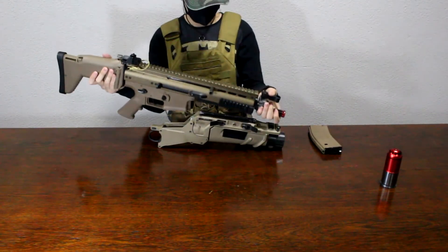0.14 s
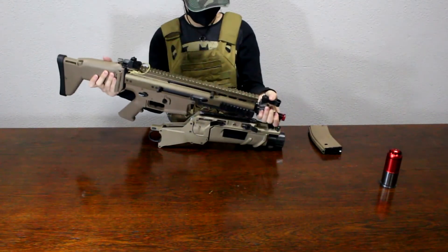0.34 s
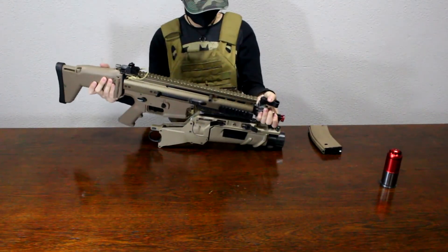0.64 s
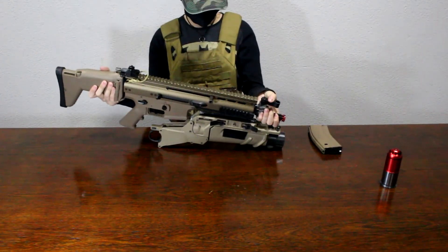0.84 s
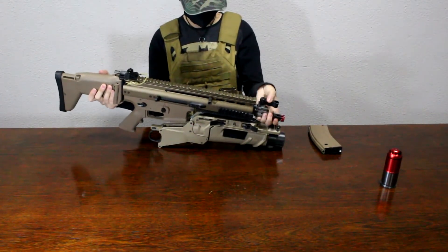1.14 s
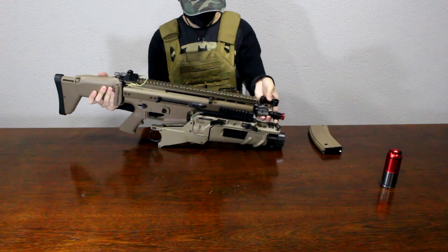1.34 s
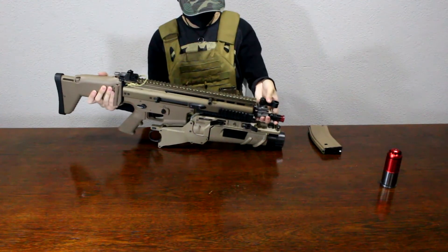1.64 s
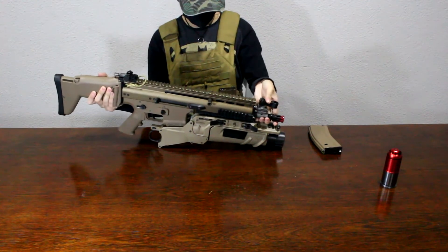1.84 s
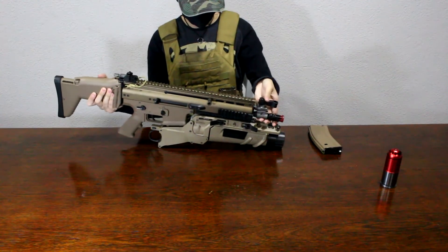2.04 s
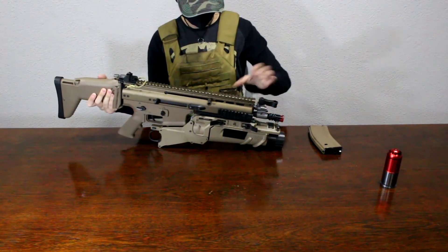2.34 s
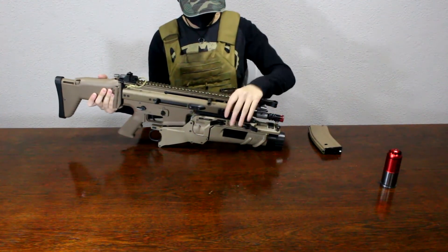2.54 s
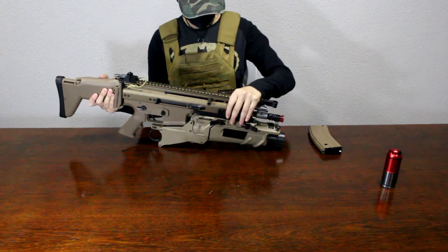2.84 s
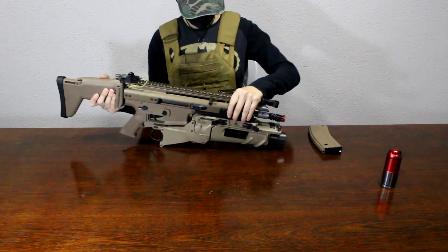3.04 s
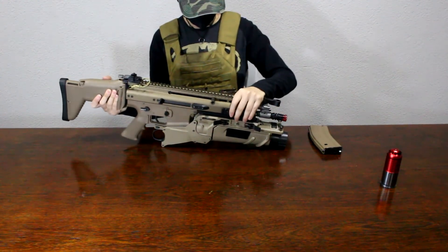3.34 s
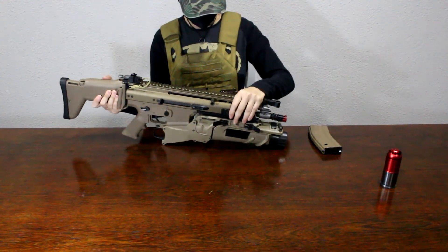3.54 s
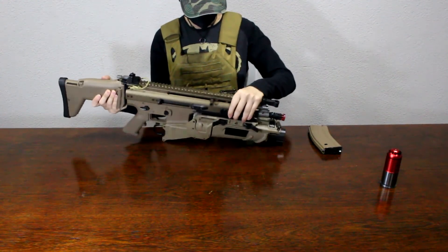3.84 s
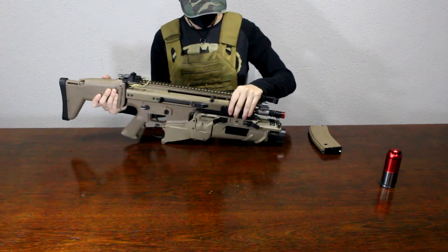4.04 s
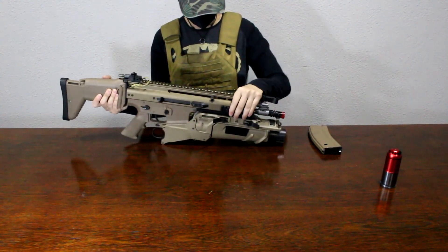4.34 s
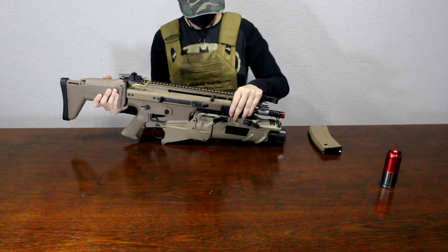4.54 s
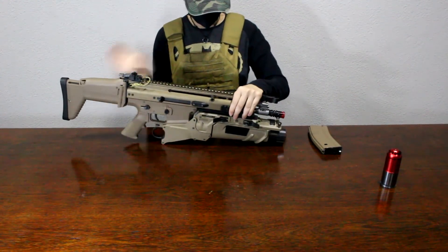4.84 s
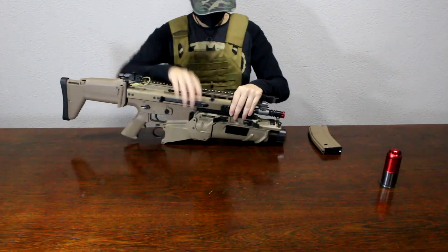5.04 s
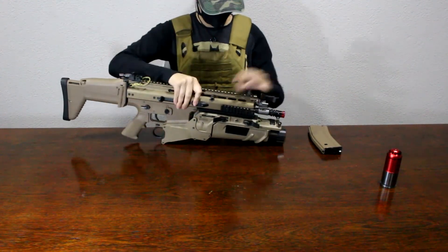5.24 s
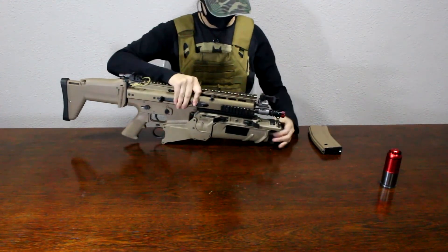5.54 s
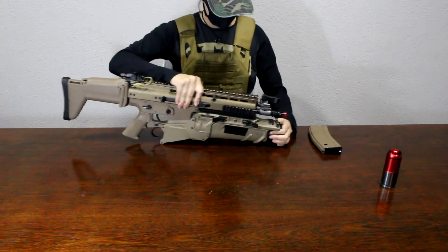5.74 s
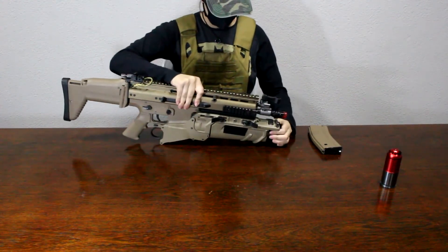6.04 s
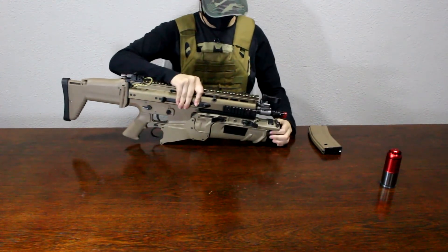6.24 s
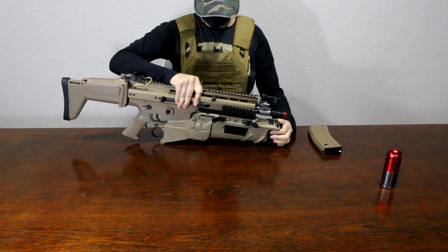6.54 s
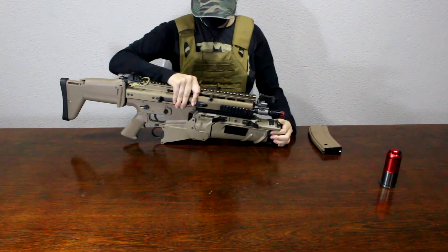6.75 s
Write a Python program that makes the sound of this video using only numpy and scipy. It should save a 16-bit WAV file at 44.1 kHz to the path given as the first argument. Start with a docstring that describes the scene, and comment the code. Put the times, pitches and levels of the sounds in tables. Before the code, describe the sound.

Plastic and metal rifle parts click and knock together on a wooden table, with two loud snaps in a bare, echoing room.

```python
"""Fitting a launcher under a rifle

Plastic and metal parts snap and knock together on a wooden table in a bare room. Each impact excites
damped modes of the parts and of the table, whose top also reflects the sound. A few blows ring the hollow
launcher tube, the hardest a steel pin, and parts and sleeves drag briefly with stick-slip friction.
The room reverberates for about a second over its own quiet hum and hiss."""
import sys
import numpy as np
from scipy import signal
from scipy.fft import rfft, irfft
from scipy.io import wavfile

SR = 44100
rng = np.random.default_rng(int(sys.argv[2]) if len(sys.argv) > 2 else 0)


def to_wav(sig):
    """Store sig (one row per channel, or 1-D mono) as 16-bit WAV at the path in sys.argv[1].

    Samples outside -1..1 are clipped; the rate is SR.
    """
    pcm = np.clip(np.atleast_2d(sig), -1, 1) * 32767
    pcm = np.round(pcm).astype(np.int16)
    wavfile.write(sys.argv[1], SR, pcm.T)  # frames by channels


N = 304664

# Modes of the launcher's shell and of the wooden table: (frequency [Hz], level [dB], decay t60 [s])
SHELL_MODES = [(380, 12, 0.012), (548.6, -3, 0.1), (684, 4.5, 0.012), (830, 6.5, 0.0095), (964, 4.5, 0.021),
               (1138, 0, 0.019), (1234, -2.5, 0.043), (1450, 2.5, 0.0063), (1700, 9.5, 0.0023)]
TABLE_MODES = [(40, -15.5, 0.027), (79.3, -8, 0.18), (119, -3.5, 0.1), (159.7, 6.5, 0.055),
               (179.8, 4.5, 0.11), (265, -2, 0.14), (323.3, -3, 0.13), (381, -0.5, 0.049)]
# Impacts between parts: (time [s], crack knee [Hz], direct gain of crack and knock [dB], duration [s],
#   snap level [dB], snap pitch [Hz], snap t60 [s], crack level [dB], crack slope [dB/octave],
#   knock level [dB], knock centre [octaves above 957 Hz], thud level [dB], thud tilt [dB/octave],
#   room send [dB])
IMPACTS = [(1.2085, 4240, -8, 0.0041, -56, 3650, 0.004, -57, -5.5, -51, -0.93, -49.5, 1, 1),
           (1.328, 3400, 1, 0.0021, -22, 2520, 0.0067, -28.5, -42, -31.5, -0.91, -34, -3, -0.5),
           (1.3291, 8100, 0.5, 0.0025, -36, 3120, 0.0068, -43.5, -18, -62, -0.59, -41.5, 8.5, 0),
           (1.7671, 3470, -8.5, 0.0012, -32, 1920, 0.0051, -35, -12.5, -33.5, -0.79, -37, -1.5, -1.5),
           (1.773, 3800, -3, 0.0034, -43, 3200, 0.006, -64, -25, -58, -0.8, -50, 3, 3.5),
           (2.049, 2500, -1, 0.013, -76, 1490, .004, -60, -20, -46.5, 0.95, -70, -19, -3),
           (2.639, 4900, -10.5, 0.0014, -30, 1480, 0.0026, -23, -10.5, -63, -0.39, -55, 10, -6),
           (3.226, 3000, -6, 0.00072, -44, 1620, .008, -61, -8, -67, -1.3, -43.5, -5, -6.5),
           (3.2802, 3780, -5, 0.0025, -31.5, 3160, 0.0045, -42.5, -59, -34, -0.82, -35.5, -4.5, -6),
           (3.3135, 4200, -6, 0.0012, -65, 3500, 0.0048, -65, -20, -45.5, -0.29, -52.5, -4, 2),
           (3.454, 4270, -8, 0.00086, -39, 2980, 0.005, -50, -14, -32.5, -0.33, -51, -21, 4),
           (3.468, 4150, -5.5, 0.0018, -1.5, 3334, 0.0085, -10.5, -9, -28.5, -1.3, -30, 2, -0.5),
           (3.516, 3000, 0, 0.012, -44, 3400, 0.006, -56, -18.5, -25.5, -1.7, -35.5, 1.5, 7),
           (3.878, 4210, 2.5, 0.0064, -31.5, 2350, 0.008, -49, -10, -35.5, -0.38, -53, 1, -2),
           (4.09, 3930, -0.5, 0.003, -39, 2940, 0.0074, -49, -39, -37.5, 0.91, -47, -0.5, 1),
           (4.2366, 3470, -1.5, 0.0032, -36, 2060, 0.0065, -42.5, -25, -39.5, -0.45, -45, -6, -0.5),
           (4.481, 3560, -1.5, 0.00085, -45.5, 2190, 0.015, -53, -22, -52.5, -1.16, -58.5, 1, -2),
           (4.672, 4230, -2.5, 0.0034, -55.5, 1000, 0.01, -53, -8, -48, 0.072, -83.5, -12.5, 3),
           (5.147, 4000, -4, 0.0018, -38, 2266, 0.015, -59, -4.5, -73, 0.3, -71, 3.5, -8),
           (5.26, 3740, -9.5, 0.0022, -34, 1686, 0.0056, -39.5, -10, -35, 0.3, -52, 4, -4),
           (5.705, 4450, -4, 0.0016, -48, 1580, 0.0037, -50.5, -15, -50, 0.18, -80, -11, 6.5),
           (5.8127, 5500, -10.5, 0.0014, -21, 3120, 0.013, -22, -27, -25, -0.23, -31.5, 0.5, 3.5),
           (5.836, 4400, 4.5, 0.005, -8.5, 3070, 0.0066, -21, -6.5, -9.5, 0.34, -25.5, -5.5, 7.5),
           (6.631, 4200, 1, 0.0062, -53, 1450, 0.0085, -67, -20, -48.5, 0.59, -84, 15, 11.5),
           (6.679, 4000, -6, 0.0012, -38, 1700, 0.0031, -62, -20, -35, -0.63, -44, -1, -3.5),
           (6.721, 4260, -13.5, 0.0025, -40, 3250, 0.0037, -32, -10.5, -60, .5, -68, -6, -5)]
KNOCK_FALL_DB = 20   # shell modes weaken this much one octave from the knock centre
SNAP_DETOUR_S, SNAP_T60_SHARE = 0.007, 0.13   # towards the walls the snap is later and shorter


def impacts():
    """Impact excitation: a force pulse drives snap, crack, knock and thud. Returns direct and room feeds."""
    direct, sent, size = np.zeros(N + SR), np.zeros((2, N + SR)), SR // 4
    scatters_db = 1.5 * rng.standard_normal((len(IMPACTS), 17))   # 9 shell modes, 8 table modes
    grits = rng.standard_normal((len(IMPACTS), size))
    t, click = np.arange(size) / SR, signal.unit_impulse(size)
    late_click = np.roll(click, round(SNAP_DETOUR_S * SR))
    bass_cut = signal.butter(2, 330, "high", fs=SR, output="sos")   # small parts radiate no bass
    for k, (row, scatter_db, grit) in enumerate(zip(IMPACTS, scatters_db, grits)):
        (start, knee_hz, direct_db, duration, snap_db, snap_hz, snap_t60, crack_db, crack_slope,
         knock_db, knock_centre, thud_db, thud_tilt, send_db) = row
        smooth, rough = contact_force(duration, grit)
        thud_modes_db = thud_tilt * octaves(TABLE_MODES, 161) + scatter_db[9:]
        thud = amp(thud_db) * struck(TABLE_MODES, smooth, thud_modes_db)
        off_centre = octaves(SHELL_MODES, 957) - knock_centre
        knock_modes_db = knock_db - KNOCK_FALL_DB * off_centre ** 2 + scatter_db[:9]
        tuned = 2 * smooth * np.cos(2 * np.pi * snap_hz * t)   # the snap swells over the contact
        top_hz = min(knee_hz * (1 + 11 / max(-crack_slope, 1)), 0.45 * SR)   # a soft contact is dull
        passband = np.vstack([bass_cut, signal.butter(2, top_hz, fs=SR, output="sos")])
        at = round(start * SR)
        paths = [(direct, tuned, amp(direct_db) * rough, 1, 0),
                 (sent[k % 2], late_click, click, SNAP_T60_SHARE, send_db)]   # two spots take turns
        for out, snap_force, force, t60_share, gain_db in paths:
            snap = amp(snap_db) * ring(snap_force, snap_hz, snap_t60 * t60_share) / t60_share
            knock = struck(SHELL_MODES, force, knock_modes_db)
            hit = snap + crack(force, crack_db, knee_hz, crack_slope) + knock
            out[at:at + size] += amp(gain_db) * (signal.sosfilt(passband, hit) + thud)
    return direct[:N], sent[:, :N]


def contact_force(duration, grit):
    """Contact force rises and falls: a smooth pulse of unit area and a rough one of unit energy."""
    t = np.arange(len(grit)) / SR
    pulse = np.sin(np.pi * np.clip(t / max(duration, 3e-4), 0, 1)) ** 2
    rough = grit * pulse
    return pulse / np.sum(pulse), rough / np.sqrt(np.sum(rough ** 2))


def ring(force, hz, t60):
    """Damped resonator: a unit impulse starts a decaying sine of amplitude 1."""
    radius, angle = amp(-60 / (max(t60, 1e-3) * SR)), 2 * np.pi * hz / SR
    return signal.lfilter([0, np.sin(angle)], [1, -2 * radius * np.cos(angle), radius ** 2], force + 1e-18)


def struck(modes, force, offsets_db):
    """Modal superposition: one force drives all modes of a body, neighbours in opposite polarity."""
    return sum((-1) ** k * amp(db + offset_db) * ring(force, hz, t60)
               for k, ((hz, db, t60), offset_db) in enumerate(zip(modes, offsets_db)))


# Spectrum radiated by small hard parts: (frequency [Hz], level [dB])
CRACK_SPECTRUM = [(600, 4), (1400, 26), (2100, 27.5), (3300, 27.5), (4500, 27), (7000, 27.5), (10000, 23),
                  (13000, 27.5), (16000, 25.5)]


def crack(force, level_db, knee_hz, db_per_octave):
    """Broadband radiation: a brief force gives an unpitched crack that falls away above its knee."""
    size = len(force)
    hz = np.arange(1, size // 2 + 2) * SR / size
    rolloff_db = db_per_octave * np.maximum(np.log2(hz / knee_hz), 0)
    shape = amp(level_db + at_hz(CRACK_SPECTRUM, hz) + rolloff_db)
    return np.roll(irfft(rfft(force) * shape, size), SR // 2000)


# Modes of the hollow launcher tube: (frequency [Hz], level [dB], decay t60 [s])
TUBE_MODES = [(546, -1.5, 0.046), (1380, 10, 0.012)]
# Blows that land on the tube: (time [s], level [dB])
TUBE_BLOWS = [(1.329, -61), (2.6377, -35), (5.836, -35)]
BLOW_S, BLOW_SEND_DB = 0.0015, 7.5


def tube():
    """Resonance of a hollow tube under short blows. Returns direct and room feeds."""
    force, clicks, size = np.zeros(N), np.zeros(N), SR // 50
    for start, db in TUBE_BLOWS:
        at = round(start * SR)
        _, rough = contact_force(BLOW_S, rng.standard_normal(size))
        force[at:at + size] += amp(db) * rough
        clicks[at] = amp(db + BLOW_SEND_DB)
    return struck(TUBE_MODES, force, [0, 0]), struck(TUBE_MODES, clicks, [0, 0])


# Ringing of a small steel pin: (time [s], frequency [Hz], level [dB], decay t60 [s])
PIN_RINGS = [(5.840, 9663, -28, .25)]


def pin():
    """Free vibration: a lightly damped steel pin rings on after the hardest blow."""
    return sum(amp(db) * ring(np.arange(N) == round(start * SR), hz, t60)
               for start, hz, db, t60 in PIN_RINGS)


# Parts and sleeves dragging: (time [s], duration [s], rumble [dB], scrape [dB], cloth rustle [dB])
DRAG_STROKES = [(0.795, 0.28, -68, -109, -97), (1.212, 0.15, -83, -89, -77), (1.582, 0.13, -59, -88, -97),
                (3.17, 0.067, -50.5, -72, -95), (3.676, 0.14, -45, -72, -91),
                (4.666, 0.13, -83, -69.5, -71), (4.819, 0.12, -67.5, -70, -83),
                (5.525, 0.11, -65, -68.5, -102), (5.69, 0.061, -64, -61, -96), (5.92, 0.053, -40, -28, -77),
                (6.592, 0.13, -54, -59, -98)]
DRAG_ATTACK_S, DRAG_RELEASE_DB_PER_S = 0.022, 138
COARSE_SLIPS_PER_S, FINE_SLIPS_PER_S = 900, 5000


def drags():
    """Stick-slip friction: coarse slips shake table and shell; finer ones scrape and rustle."""
    coarse = (rng.random(N) < COARSE_SLIPS_PER_S / SR) * rng.standard_normal(N)
    table = sum(amp(db) * ring(coarse, hz, t60) for hz, db, t60 in TABLE_MODES[1:])
    shell = sum(amp(db) * ring(coarse, hz, t60) for hz, db, t60 in SHELL_MODES)
    rumble = unit_rms(table + amp(-3.5) * shell)
    fine = (rng.random(N) < FINE_SLIPS_PER_S / SR) * rng.standard_normal(N)
    scrape = unit_rms(bandpass(fine, 900, 3450))
    rustle = unit_rms(bandpass(fine, 4500, 9300))
    out, t = np.zeros(N), np.arange(N) / SR
    for start, duration, rumble_db, scrape_db, rustle_db in DRAG_STROKES:
        attack = np.clip((t - start) / DRAG_ATTACK_S, 0, 1)
        release = amp(-DRAG_RELEASE_DB_PER_S * np.maximum(t - start - duration, 0))
        friction = amp(rumble_db) * rumble + amp(scrape_db) * scrape + amp(rustle_db) * rustle
        out += attack * release * friction
    return out


# Reverberation of the bare room: (frequency [Hz], level [dB], decay t60 [s], hold before decay [s])
REVERB_BANDS = [(95, -19.5, 0.68, 0.028), (255.6, -8, 0.58, 0.065), (472, -12.5, 0.74, 0.049),
                (880, -17, 0.84, 0.014), (1908, -20, .82, 0.0084), (4750, -19, 0.68, 0.0041),
                (8050, -14.5, 0.54, .005), (13000, -12.5, 0.225, .005), (15500, -15.5, 0.154, .005)]
# Coherence of the reverberant field: (frequency [Hz], left-right correlation [-1 to 1])
REVERB_COHERENCE = [(60, 1), (180, 0.98), (550, 0.99), (1650, 0.64), (4970, 0.5), (15000, 0.065)]
REVERB_BUILD_S = 0.0005


def reverberation(feeds):
    """Diffuse field: reflections build up, then die band by band; each feed has its own echo pattern."""
    t, out = np.arange(int(1.4 * SR)) / SR, 0
    for feed in feeds:
        response = 0
        for hz, band in stereo_bands(len(t), REVERB_COHERENCE):
            db, t60, hold = (at_hz(REVERB_BANDS, hz, column) for column in (1, 2, 3))
            response += amp(db - 60 * np.maximum(t - hold, 0) / t60) * band
        response *= (1 - np.exp(-t / REVERB_BUILD_S)) / 10
        out += signal.fftconvolve(feed[None], response, axes=1)[:, :N]
    return out


# Spectrum of the room's hiss: (frequency [Hz], relative spectral density [dB])
HISS_SPECTRUM = [(15, -64), (25, -35), (120, -12.5), (242, -10.5), (285, -16), (416, -12), (503, -15),
                 (695, -18), (911, -22), (1370, -23), (2690, -27.5), (11600, -38), (12800, -53.5),
                 (16000, -83)]
# Coherence of the hiss: (frequency [Hz], left-right correlation [-1 to 1])
HISS_COHERENCE = [(60, 0.058), (240, 0.79), (950, -0.16), (3770, -0.27), (15000, 0.00037)]
HISS_DB, HUM_DB, HUM_HZ, HUM_T60_S = -58, -70, 78, 0.58


def room_tone():
    """Ambient noise: steady hiss, and a wavering hum where distant rumble excites a low room mode."""
    hiss = sum(amp(at_hz(HISS_SPECTRUM, hz)) * band for hz, band in stereo_bands(N, HISS_COHERENCE))
    hum = ring(rng.standard_normal(N), HUM_HZ, HUM_T60_S)
    return amp(HISS_DB) * unit_rms(hiss) + amp(HUM_DB) * unit_rms(hum)


def stereo_bands(size, coherence):
    """Partial coherence from mid and side noise: yields each third octave's centre and stereo band."""
    edges = 25 * 2 ** (np.arange(29) / 3)
    white = rng.standard_normal((2, 2, size))
    for k, (low, high) in enumerate(zip(edges, edges[1:])):
        mid, side = bandpass(white[k % 2], low, high)
        hz = np.sqrt(low * high)
        correlation = np.clip(at_hz(coherence, hz), -1, 1)
        yield hz, np.sqrt(1 + correlation) * mid + np.sqrt(1 - correlation) * side * [[1], [-1]]


def bandpass(x, low_hz, high_hz):
    """Band-pass filtering between two edges."""
    return signal.sosfilt(signal.butter(2, [low_hz, high_hz], "band", fs=SR, output="sos"), x)


def amp(db):
    """Amplitude ratio of a level in decibels."""
    return 10 ** (np.asarray(db) / 20)


def unit_rms(x):
    """Normalisation to rms 1."""
    return x / np.sqrt(np.mean(x ** 2) + 1e-20)


def at_hz(points, hz, column=1):
    """Interpolation of a table column over log frequency."""
    points = np.array(points, float)
    return np.interp(np.log(hz), np.log(points[:, 0]), points[:, column])


def octaves(modes, centre_hz):
    """Interval from a centre frequency to each mode."""
    return np.log2(np.array(modes)[:, 0] / centre_hz)


TABLE_ECHO_S, TABLE_ECHO_DB = 0.0045, -5


def scene():
    """Superposition of direct sound, its reflection off the table top, reverberation and room tone."""
    hits, hits_sent = impacts()
    taps, taps_sent = tube()
    friction = drags()
    direct = hits + taps + friction + pin()
    lag = round(TABLE_ECHO_S * SR)
    reflection = amp(TABLE_ECHO_DB) * np.pad(direct[:-lag], (lag, 0))
    return direct + reflection + reverberation(hits_sent + [taps_sent, friction]) + room_tone()


GAIN_KNEE_DB, GAIN_SHARE, GAIN_ATTACK_S, GAIN_RELEASE_DB_PER_S = -18.5, 0.44, 0.0057, 17


def gain_control(x):
    """Compression: peaks above the knee pull the gain down quickly; it recovers at a steady rate."""
    peak_db = 20 * np.log10(np.abs(x).max(axis=0) + 1e-9)
    cut_db = GAIN_SHARE * np.maximum(peak_db - GAIN_KNEE_DB, 0)
    recovery_db = GAIN_RELEASE_DB_PER_S * np.arange(N) / SR
    held_db = np.maximum.accumulate(cut_db + recovery_db) - recovery_db
    pole = np.exp(-1 / (GAIN_ATTACK_S * SR))
    return x * amp(-signal.lfilter([1 - pole], [1, -pole], held_db))


# Sensitivity imbalance of the microphone pair: (frequency [Hz], left minus right [dB])
MIC_BALANCE = [(60, -3), (180, -4), (550, -4.5), (1650, -3), (4970, -2.0), (15000, -1)]
LOW_CUT_HZ, HIGH_STOP_HZ = 51.3, 16900


def record(dry):
    """Transduction: the left capsule is weaker, loud hits are compressed, and lows and top are cut."""
    left_gain = amp(at_hz(MIC_BALANCE, np.arange(1, N // 2 + 2) * SR / N) / 2)
    picked_up = irfft(rfft(dry) * [left_gain, 1 / left_gain], N)
    low_cut = signal.butter(2, LOW_CUT_HZ, "high", fs=SR, output="sos")
    high_cut = signal.cheby2(12, 70, HIGH_STOP_HZ, fs=SR, output="sos")
    return signal.sosfilt(np.vstack([low_cut, high_cut]), gain_control(picked_up))


dry = scene()
out = record(dry)
to_wav(out)
```